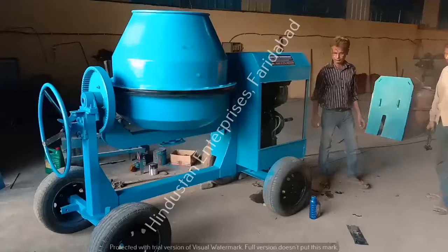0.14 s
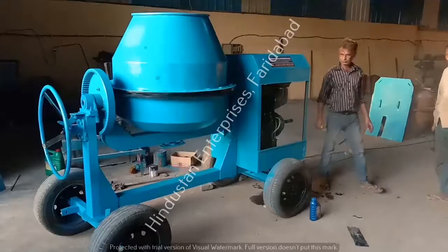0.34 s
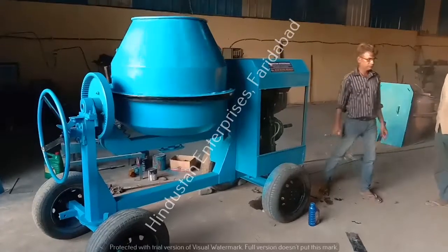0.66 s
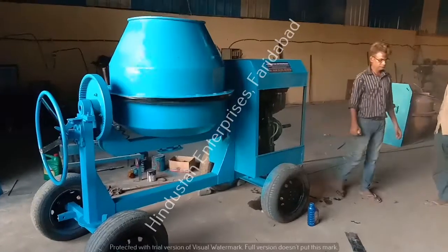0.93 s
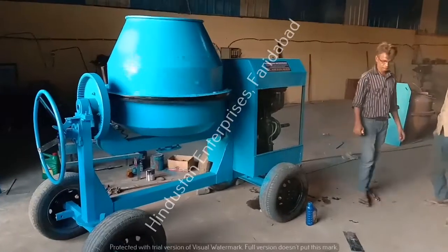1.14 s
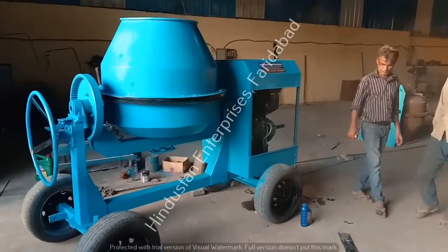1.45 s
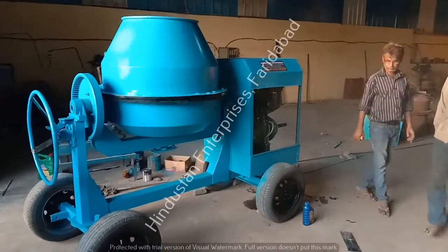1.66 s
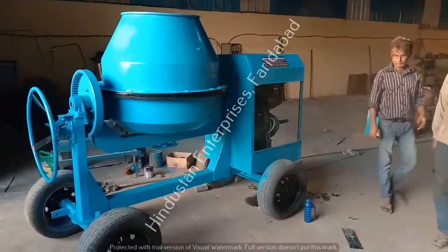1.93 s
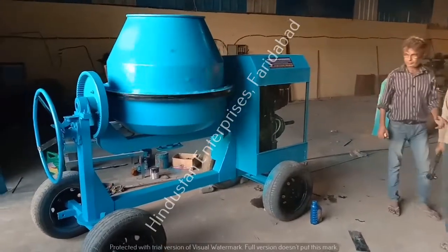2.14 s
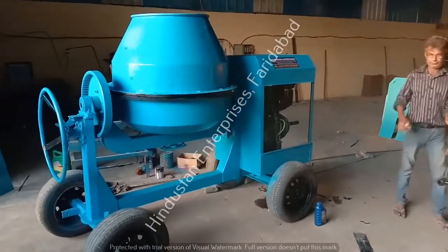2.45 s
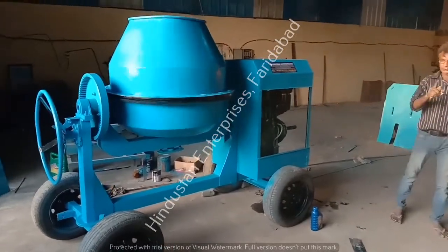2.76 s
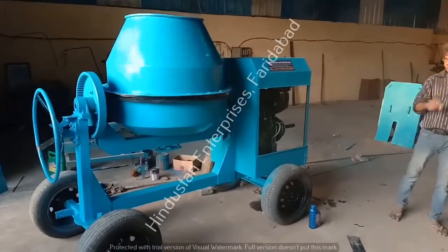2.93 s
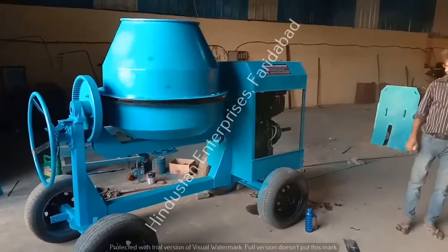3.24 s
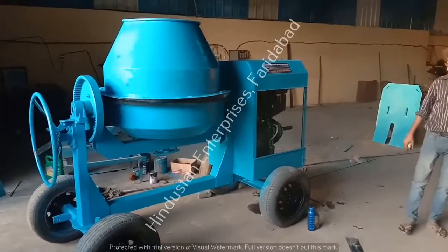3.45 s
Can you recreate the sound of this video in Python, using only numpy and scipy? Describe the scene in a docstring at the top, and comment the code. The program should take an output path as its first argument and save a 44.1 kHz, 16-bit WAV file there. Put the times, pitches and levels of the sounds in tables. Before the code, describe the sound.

A concrete mixer roars in a hard-walled workshop, rapid engine thuds under dense steel clatter

```python
"""A concrete mixer's single-cylinder four-stroke diesel at about 1550 rpm, a few metres away in a hard-walled workshop.
Exhaust: partials of the firing rate that join in a thud each cycle. Knocks: one run of impulses, repeated
each cycle or turn, coloured by the block. Rattle: random impacts of loose gears and drum that ring the steel.
Ticks: bright gritty bursts, about one a crank turn. All but the exhaust pass through a diffuse hall tail.
The sound fades in at the start."""
import sys
import numpy as np
from scipy import signal
from scipy.fft import rfft, irfft
from scipy.io import wavfile
from scipy.ndimage import uniform_filter1d

SR = 44100
rng = np.random.default_rng(int(sys.argv[2]) if len(sys.argv) > 2 else 0)


def waveform_to_disk(signal):
    """Save audio, clipped to [-1, 1], as 16-bit WAV at the path in sys.argv[1]."""
    frames = np.transpose(np.atleast_2d(signal))
    scaled = np.clip(frames, -1, 1) * 32767
    samples = np.round(scaled).astype(np.int16)
    wavfile.write(sys.argv[1], SR, samples)


N = 158319
T = np.arange(N) / SR

# standing waves come and go; only the swing about the mean is used
# [t/s, boom level/dB, low-middle level/dB, bass level/dB]
STANDING_WAVES = [(0.5, -19, -23.5, -24.5), (0.73, -22, -24, -36), (1.0, -21, -22.5, -25),
                  (1.3, -20.5, -24, -28.5), (1.62, -25.5, -24, -22), (1.92, -28, -23, -26),
                  (2.17, -18.5, -24, -22.5), (2.45, -18.2, -21.5, -25.5), (2.7, -26.5, -27, -24.5),
                  (2.87, -22.5, -24.5, -20.5), (3.05, -25, -23, -25), (3.3, -20.5, -23, -24),
                  (3.5, -21, -24.5, -26)]
THUD_AT_CYCLE = 0.62  # place in the cycle, 0 to 1
HALL_T60_S, HALL_GAP_S = 1, 0.008
BRIGHT_DRIFT_PER_S = 8  # shifting of the hall's reflections for rattle and ticks


def undb(db):
    """Decibels to gain."""
    return 10 ** (np.asarray(db) / 20)


def level(x, db):
    """Set the rms level."""
    return x * undb(db) / np.sqrt(np.mean(x ** 2))


def walk(rate_per_s):
    """Slow chance of unit deviation: random levels held 1 / rate and slewed twice."""
    hold = int(SR / rate_per_s)
    steps = np.repeat(rng.standard_normal(N // hold + 1), hold)
    slewed = uniform_filter1d(uniform_filter1d(steps, hold), hold)[:N]
    return slewed / slewed.std()


def swing(table, axis):
    """One column of a level curve, in dB around its mean power."""
    rows = np.array(table)
    db = np.interp(T, rows[:, 0], rows[:, axis])
    return db - 10 * np.log10(np.mean(undb(db) ** 2))


def colour(x, points, size=4096):
    """Minimum-phase filter through (f/Hz, gain/dB) points, via the folded cepstrum."""
    hz, db = np.array(points).T
    f_hz = np.maximum(np.arange(size // 2 + 1) * SR / size, 1)
    gain_db = np.interp(np.log(f_hz), np.log(hz), db)
    cepstrum = irfft(np.log(undb(gain_db)))
    cepstrum[1:size // 2] *= 2
    cepstrum[size // 2 + 1:] = 0
    impulse_response = irfft(np.exp(rfft(cepstrum)))
    return signal.fftconvolve(x, impulse_response)[:N]


def clicks(times_s, sizes):
    """One impulse at each time."""
    inside = (times_s > 0) & (times_s < T[-1])
    return np.bincount((times_s[inside] * SR).astype(int), sizes[inside], N)


def grains(per_s, spread_db):
    """Random tiny impacts of either sign and uneven strength."""
    struck = rng.random(N) < per_s / SR
    sign = np.sign(rng.standard_normal(N))
    strength_db = spread_db * np.clip(rng.standard_normal(N), -2, 2)
    return struck * sign * undb(strength_db)


def hall(x, wet_db, drift_per_s, count=6):
    """Direct sound and the workshop's diffuse tail, whose pattern of reflections keeps shifting."""
    t = T[:SR // 2]
    decay = np.exp(-np.log(1000) * t / HALL_T60_S) * (t > HALL_GAP_S)
    tails = rng.standard_normal((count, len(t))) * decay
    wet = signal.fftconvolve(x[None], tails / np.linalg.norm(tails[0]), axes=1)[:, :N]
    shares = np.array([walk(drift_per_s) for _ in range(count)])
    mixed = np.sum(wet * shares, axis=0) / np.linalg.norm(shares, axis=0)
    return x + undb(wet_db) * mixed


def when(cycle, places):
    """Times at which the engine passes these places in its cycle: cycles x places."""
    return np.interp(np.arange(int(cycle[-1]) + 1)[:, None] + places, cycle, T, right=-1)


def ticks(cycle):
    """Running gear: a short gritty burst on each crank turn, strong and weak by turns."""
    # [place in cycle, relative level/dB]
    tick_places = [(.565, 0), (.05, -4)]
    # the stronger tick grows clearer [t/s, added level/dB]
    strong_tick_rise = [(.5, -4), (1.05, -3.5), (1.45, .5), (2.5, 1), (3.5, 0)]
    # tick spectrum [f/Hz, gain/dB]
    tick_spectrum = [(2000, -13), (5000, 8.5), (7500, -2), (9800, 3), (11500, -1.5), (13000, -4),
                     (15000, -11)]
    decay_s, scatter_db, grains_per_s = 0.013, 1.2, 9000
    wet_db, rms_db = -5.5, -34.3

    places, db = np.array(tick_places).T
    times_s = when(cycle, places)
    db = db + (db == db.max()) * np.interp(times_s, *np.array(strong_tick_rise).T)
    db = db + scatter_db * rng.standard_normal(times_s.shape)
    starts = clicks(times_s, undb(db))
    burst = signal.lfilter([1], [1, -np.exp(-1 / (decay_s * SR))], starts)
    grit = colour(burst * grains(grains_per_s, spread_db=0.5), tick_spectrum)
    return level(hall(grit, wet_db, BRIGHT_DRIFT_PER_S), rms_db)


def rattle(cycle):
    """Loose gear teeth chatter, slightly harder around each thud, and ring the steel resonances."""
    # gear and drum spectrum [f/Hz, gain/dB]
    gear_spectrum = [(60, -36), (200, -13), (550, -5.5), (1000, -3), (1350, -1.5), (1750, 2), (1950, -5.5),
                     (2400, -1.5), (2800, -4.5), (3100, 0.5), (3700, -1.5), (4400, -5), (5200, -13),
                     (7000, -19.5), (10000, -21), (12000, -26), (15000, -45)]
    # ringing steel of drum and gear [f/Hz, t60/s, relative level/dB]
    steel_modes = [(822, 0.6, -10), (854, 0.37, 3), (907, 0.38, -2), (1570, 0.34, 4.5), (1830, 0.047, -23),
                   (2504, 0.085, 3), (3140, 0.074, -1), (3200, .1, -15)]
    hits_per_s, spread_db, throb_depth = 2000, 2.5, 0.059
    wet_db, chatter_rms_db, ring_rms_db = 2, -16.5, -31

    throb = 1 + throb_depth * np.cos(2 * np.pi * (cycle - THUD_AT_CYCLE))
    hits = hall(grains(hits_per_s, spread_db) * throb, wet_db, BRIGHT_DRIFT_PER_S)
    ring = 0
    for hz, t60_s, db in steel_modes:
        pole = np.exp((2j * np.pi * hz - np.log(1000) / t60_s) / SR)
        mode = signal.lfilter([1], [1, -pole], hits).imag
        ring = ring + level(mode, db)
    return level(colour(hits, gear_spectrum), chatter_rms_db) + level(ring, ring_rms_db)


def knocks(cycle, count=36):
    """Piston, cam and teeth strike at the same crank angles again and again, some each turn, some each cycle."""
    # engine block and frame spectrum [f/Hz, gain/dB]
    block_spectrum = [(55, -56.5), (90, -7.5), (170, -1.5), (280, -2), (380, 2), (480, -5), (560, -5.5),
                      (700, -5), (850, -1.5), (1100, -3.5), (1600, -4), (2500, -10), (5000, -42)]
    jitter_s, scatter_db = 0.00016, 4  # from blow to blow
    spread_db = 5  # between places
    turn_share, middle_depth = 0.71, 0.9
    wet_db, drift_per_s, rms_db = -0.5, 1.417, -20.5

    def run(places, sizes):
        """Repeat one pattern of blows, each a little off in time and strength."""
        times_s = when(cycle, places)
        late, strength = rng.standard_normal((2,) + times_s.shape)
        return clicks(times_s + jitter_s * late, sizes * undb(scatter_db * strength))

    # row 0: once a cycle; row 1: once a turn
    places = (np.arange(count) + rng.random((2, count))) / count
    signs = rng.choice([-1, 1], (2, count))
    sizes = signs * undb(spread_db * rng.standard_normal((2, count)))
    each_cycle = run(places[0], sizes[0])
    each_turn = run(np.r_[places[1], places[1] + 1] / 2, np.tile(sizes[1], 2))
    blows = level(each_cycle, 0) + turn_share * level(each_turn, 0)
    in_hall = hall(colour(blows, block_spectrum), wet_db, drift_per_s)
    return level(in_hall, rms_db) * undb(middle_depth * swing(STANDING_WAVES, axis=2))


def exhaust(cycle):
    """Partials of the firing rate: the low ones join in a thud, the higher ones are scattered and waver."""
    # drone [multiple of firing rate, level before trim/dB]
    drone = [(5, -50), (6, -46), (7, -38.5), (8, -31.5), (9, -38), (10, -35), (11, -43.5), (12, -34),
             (13, -37.5), (14, -36.5), (15, -45.5), (16, -29.5), (17, -38.5), (18, -29), (19, -35),
             (20, -36.5), (21, -44), (22, -38), (23, -39.5), (24, -39), (25, -39.5), (26, -38.5), (27, -43),
             (28, -34.5), (29, -52), (36, -36.5)]
    # multiples that swell and sink
    swelling_orders = (16, 18, 28, 36)
    # only the swing about the mean is used [t/s, 16th/dB, 18th/dB, 28th/dB, 36th/dB]
    swells = [(0.5, -27, -35.5, -38, -36), (0.73, -35, -36, -34, -44), (1.0, -41, -24.5, -49, -41),
              (1.3, -22.5, -30, -48, -46), (1.62, -34, -44.5, -35, -32), (1.92, -26.5, -46, -33, -37),
              (2.17, -28, -30.9, -41, -44.7), (2.45, -36, -21, -31.5, -35), (2.7, -41, -28.5, -36, -31),
              (2.87, -42, -35, -31, -32), (3.05, -38, -28.5, -33, -30), (3.3, -37.8, -41, -29, -29),
              (3.5, -37.7, -43, -31.5, -40)]
    scatter_hz = 140.53  # above this pitch the hall scatters the partials
    boom_above_hz, boom_depth, bass_depth, swell_depth = 140, 0.81, 0.82, 0.84
    trim_db, waver_db, wander_rad = -0.8, 2, 0.28
    firing_lag_rad = 1.15  # odd partials, from the firing, lag those of the turning crank

    boom_db = boom_depth * swing(STANDING_WAVES, axis=1)
    bass_db = bass_depth * swing(STANDING_WAVES, axis=3)
    out = 0
    for k, db in drone:
        hz = k * cycle[-1] / T[-1]
        spread = hz / scatter_hz
        if k in swelling_orders:
            change_db = swell_depth * swing(swells, axis=1 + swelling_orders.index(k))
        else:
            body_db = boom_db if hz > boom_above_hz else bass_db
            change_db = body_db + waver_db * min(spread / 2, 1) * walk(2.81)
        phase = 2 * np.pi * k * (cycle - THUD_AT_CYCLE) - firing_lag_rad * (k % 2)
        phase = phase + spread ** 3 * rng.standard_normal()
        phase = phase + wander_rad * spread * walk(3)
        out = out + np.sqrt(2) * undb(db + change_db + trim_db) * np.cos(phase)
    return out


def scene():
    """One crankshaft drives every part of the mixer."""
    # engine speed [t/s, firing rate/Hz]
    firing_rate = [(0.3, 13.293), (0.6, 13.159), (0.9, 13.004), (1.2, 12.868), (1.65, 12.836),
                   (2.1, 12.895), (2.55, 12.968), (3.0, 13.02), (3.3, 13.024)]
    cycle = np.cumsum(np.interp(T, *np.array(firing_rate).T)) / SR
    return (ticks(cycle) + rattle(cycle) + knocks(cycle) + exhaust(cycle))[None]


def record(dry):
    """The highest peaks are rounded, the sound fades in, and the top is cut."""
    ceiling, knee = 0.67, 3.8  # limit of the rounding; a higher knee rounds less
    fade_start_s, fade_full_s, fade_from, fade_power = 0.14, 0.42, 0.13, 1.23
    top_hz = 15300
    rounded = dry / (1 + np.abs(dry / ceiling) ** knee) ** (1 / knee)
    ramp = np.interp(T, [fade_start_s, fade_full_s], [fade_from, 1], left=0)  # silent before the start
    top_cut = signal.ellip(10, 0.2, 80, top_hz, fs=SR, output="sos")
    return signal.sosfilt(top_cut, rounded * ramp ** fade_power)


dry = scene()
out = record(dry)
waveform_to_disk(out)
```